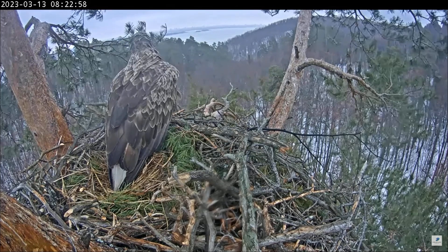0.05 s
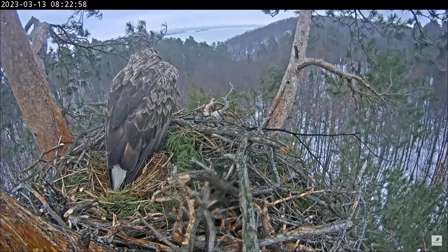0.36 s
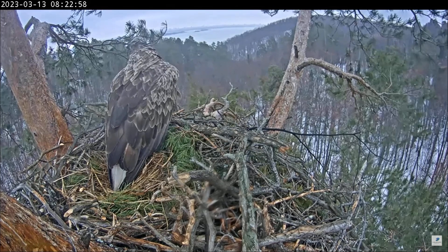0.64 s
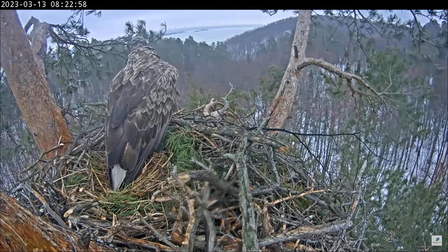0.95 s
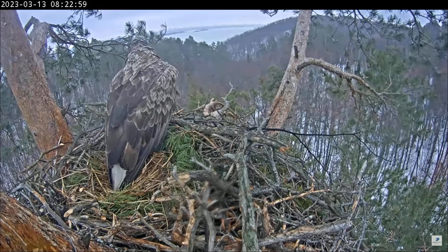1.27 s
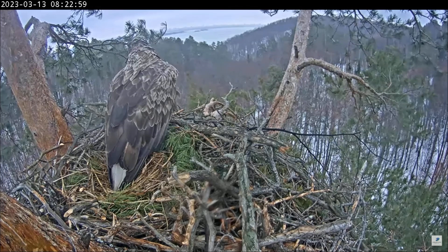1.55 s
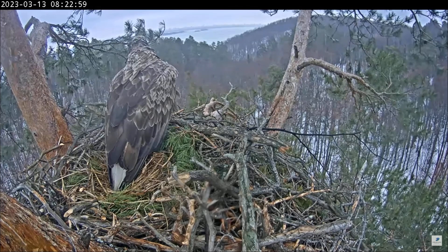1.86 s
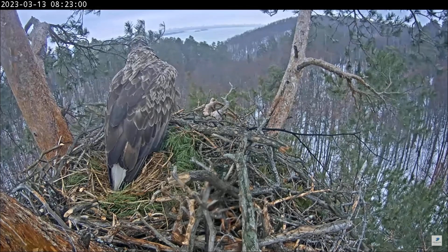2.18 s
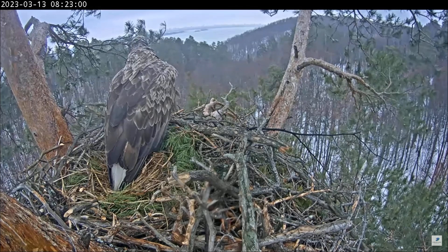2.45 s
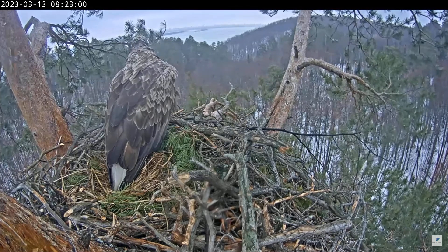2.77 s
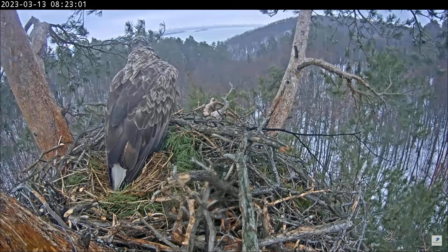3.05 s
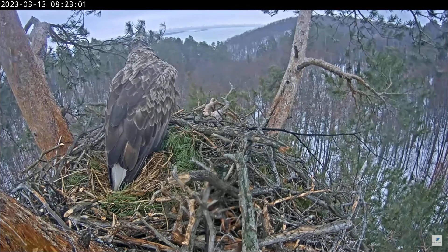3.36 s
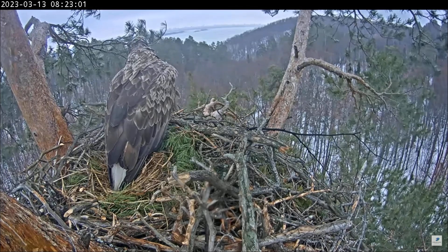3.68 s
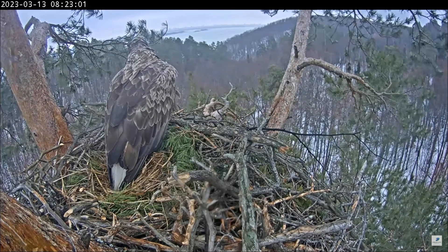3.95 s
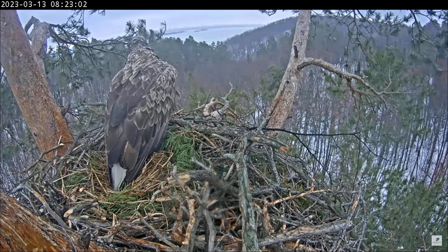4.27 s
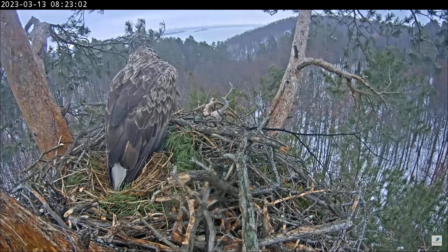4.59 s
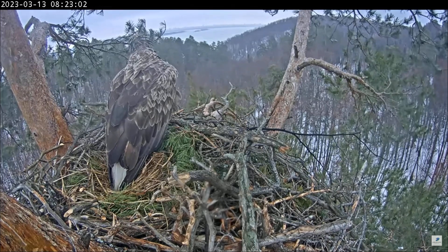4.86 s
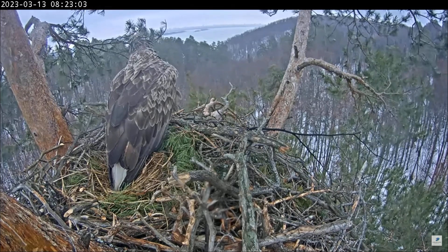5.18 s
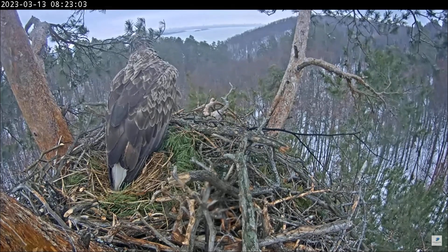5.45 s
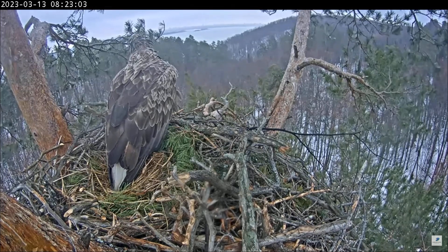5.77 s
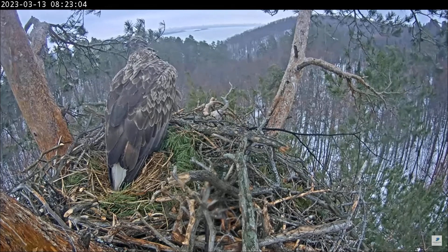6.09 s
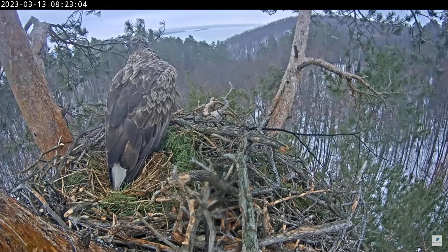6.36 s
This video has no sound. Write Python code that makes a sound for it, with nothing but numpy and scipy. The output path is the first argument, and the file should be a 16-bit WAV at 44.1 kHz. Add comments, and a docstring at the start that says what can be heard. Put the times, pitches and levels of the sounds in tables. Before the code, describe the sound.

The first half second is silent. At 0.5 seconds the sound cuts in on a mild gust, easing by about 2 seconds into a steady roar of wind in the treetops. Beneath it runs a low, wandering rumble, with soft microphone hiss and a faint, thin, high whine, all lasting until the end near 6.7 seconds. Twigs tick irregularly close by, tiny and dry, sharpest at about 1.6 and 5.4 seconds. From 1.8 seconds small birds whistle faintly far away, echoing among the trunks, and again around 2.3, 3.9 and 5 seconds. A nearer small bird gives two high, falling chirps around 3 seconds and three more between 5.4 and 5.8 seconds. The birds stay quiet under the wind. Everything is heard from one small fixed microphone at a treetop nest, with the highest treble missing.

```python
"""Winter forest, from a small fixed microphone at a treetop nest, with nothing above 8 kHz.
After half a second the sound cuts in on a gust, which settles to a steady roar of wind in the crowns
over a low rumble and the microphone's own hiss and thin whine. Twigs tick close by from then on.
From about 1.8 s small birds whistle far off, echoing from the trunks; a nearer bird calls
twice around 3 s and three times around 5.5 s."""
import sys
import numpy as np
from scipy import signal
from scipy.fft import rfft, irfft
from scipy.io import wavfile

SR = 44100
rng = np.random.default_rng(int(sys.argv[2]) if len(sys.argv) > 2 else 0)


def unload_wav(signal):
    """Save mono or channel-first audio to the path in sys.argv[1] as 16-bit WAV at rate SR, clipped to [-1, 1]."""
    wavfile.write(
        sys.argv[1],
        SR,
        np.round(np.clip(np.atleast_2d(signal).T, -1, 1) * 32767).astype(np.int16),
    )


N = 287973
T = np.arange(N) / SR
START_S = 0.5085  # the microphone cuts in


def undb(db):
    """Decibels to gain."""
    return 10 ** (np.asarray(db) / 20)


def level(x, db):
    """Set the rms level."""
    return x * undb(db) / np.sqrt(np.mean(x ** 2))


def add(out, s, x):
    """Mix x in at time s."""
    i = int(s * SR)
    out[i:i + len(x)] += x[:max(N - i, 0)]


def walk(rate_hz):
    """Smooth random drift that changes about rate_hz times a second; rms 1."""
    hz = np.fft.rfftfreq(N, 1 / SR)
    return level(irfft(rfft(rng.standard_normal(N)) * np.exp(-(hz / rate_hz) ** 2), N), 0)


def flickering_noise(points, flicker_db, flicker_hz, band_count=12):
    """Noise of a given colour, in overlapping bands whose levels flicker on their own."""
    octave = np.log2(np.maximum(np.fft.rfftfreq(N, 1 / SR), 1))
    hz, db = np.transpose(points)
    edges = np.log2(hz)
    spectrum = rfft(rng.standard_normal(N)) * undb(np.interp(octave, edges, db))
    spectrum *= np.minimum(2 ** (octave - edges[0]), 1)  # dies away below the lowest point
    centres = np.linspace(edges[0], edges[-1], band_count)
    bands = (irfft(spectrum * np.interp(octave, centres, share), N) for share in np.eye(band_count))
    return sum(band * undb(flicker_db * walk(flicker_hz)) for band in bands)


def echoes(x, delay_s, t60_s, db):
    """A dense cloud of reflections that returns after a delay and falls 60 dB in t60_s."""
    tail = rng.standard_normal(SR) * np.exp(-np.log(1000) * T[:SR] / t60_s)
    cloud = signal.fftconvolve(x, tail / np.linalg.norm(tail))
    return undb(db) * np.pad(cloud, (int(delay_s * SR), 0))[:N]


def wind(steady_db=-18.1, gust_db=2.0, gust_decay_s=0.75):
    """Eddies in the crowns make a broad roar; the opening gust dies away to a steady level."""
    # spectrum of the roar: f/Hz, relative density/dB
    roar_spectrum = [(20, -6.5), (40, 2.5), (62, 4), (95, 1.5), (130, 1.5), (220, 0), (450, 1),
                     (700, -1.46), (1000, -2.5), (1280, -7.5), (1450, -12), (1650, -23.5), (2000, -28),
                     (3500, -65.5)]
    roar = level(flickering_noise(roar_spectrum, flicker_db=0.5, flicker_hz=20), steady_db)
    strength_db = gust_db * np.exp(-np.maximum(T - START_S, 0) / gust_decay_s)
    return roar * undb(strength_db + 0.18 * walk(7.2))


def rumble(octave_db=-37, swell_db=0.2):
    """Under the wind, a narrow low drone and its octave wander in pitch and swell."""
    # course of the drone's fundamental: t/s, f/Hz, level/dB
    drone = [(0.5, 60.18, -36), (3.1, 61.75, -34.5), (3.8, 66.2, -32), (4.3, 70.86, -31), (5.0, 63.03, -40),
             (5.8, 72, -28), (6.5, 68.1, -36.5)]
    times, *columns = np.transpose(drone)
    hz, low_db = (np.interp(T, times, column) for column in columns)
    phase = 2 * np.pi * np.cumsum(hz) / SR
    low, octave = (walk(5.6) * np.sin(k * phase) + walk(7) * np.cos(k * phase) for k in (1, 2))
    return (level(low, low_db) + level(octave, octave_db)) * undb(swell_db * walk(1))


def microphone_noise(hiss_db=-33, whine_hz=5110, whine_db=-48.5):
    """The microphone's electronics add hiss and a thin, slightly unsteady whine."""
    # spectrum of the hiss: f/Hz, relative density/dB
    hiss_spectrum = [(900, 4), (1750, 0.5), (2150, 4), (2500, .5), (2800, 0), (3150, 0.5), (3450, 0),
                     (3850, -2.5), (4500, -3), (5250, -3), (5800, -4.5), (6500, -7), (7200, -12.5),
                     (7700, -23)]
    hiss = flickering_noise(hiss_spectrum, flicker_db=0.88, flicker_hz=18)
    hz = whine_hz + 7 * walk(20)
    whine = np.sin(2 * np.pi * np.cumsum(hz) / SR) * undb(walk(9))
    return level(hiss, hiss_db) + level(whine, whine_db)


def tick(hz, low_db=-15, low_ratio=0.57, cycles_to_peak=3.6):
    """A twig rings for a few cycles in two modes: rounded swell, quick decay."""
    cycles = hz * T[:SR // 50]
    age = cycles / cycles_to_peak
    ring = np.sin(2 * np.pi * cycles) + undb(low_db) * np.sin(2 * np.pi * low_ratio * cycles)
    return (age * np.exp(1 - age)) ** 4 * ring


def twigs(faint_db=-33, spread_db=1.75, faint_count=30):
    """Close ticks over a sparse faint crackle, scattered by the sticks of the nest."""
    # twig ticks: t/s, ring f/Hz, ring peak level/dB, lower mode level/dB relative to the ring
    ticks = [(0.561, 5200, -20, -21), (0.77, 5700, -21, -20), (1.331, 5640, -14, -18),
             (1.6306, 3040, -4.5, -25), (1.78, 2920, -18.5, -15), (2.0032, 3020, -23, -13),
             (2.2515, 3100, -22, -10), (2.5416, 3020, -17, -20), (3.1974, 2980, -15.5, -15),
             (3.417, 3200, -19, -9), (3.9814, 3130, -15, -22), (4.2546, 6200, -21, -14),
             (5.017, 5500, -20, 0), (5.4358, 3130, -8, -5), (5.4743, 3700, -18, -15),
             (5.5839, 3120, -16.5, -2), (5.6328, 5900, -20.5, -5), (6.5108, 3220, -15, -15)]
    out = np.zeros(N)
    for s, hz, db, low_db in ticks:
        add(out, s, undb(db) * tick(hz, low_db))
    for when, pitch, size in rng.random((faint_count, 3)):
        db = faint_db - spread_db * np.log(1 - size)  # most are faint, a few louder
        add(out, when * T[-1], undb(db) * tick(3000 + 3500 * pitch))
    return out + echoes(out, delay_s=0, t60_s=0.033, db=-7)


def bird_notes():
    """Every whistle as t/s, length/s, start f/Hz, end f/Hz, relative level/dB."""
    # syllables of the nearer bird: t/s, lead-in f/Hz, relative chirp level/dB, relative slur level/dB
    syllables = [(2.832, 7240, -23, -32), (3.033, 7070, -25.5, -39.5), (5.367, 7000, -21, -33),
                 (5.568, 6940, -24, -29), (5.766, 6950, -29.5, -31)]
    # whistles of the far birds, by kind: length/s, start f/Hz, end f/Hz
    far_whistles = {"thin": (0.12, 5290, 5175), "sigh": (0.085, 2680, 2530), "pipe": (0.06, 2135, 2190),
                    "slide": (0.055, 5900, 5150)}
    # calls of the far birds: t/s, kind, relative level/dB
    far_calls = [(1.819, "sigh", -40.5), (1.872, "thin", -38), (2.261, "thin", -38), (3.812, "pipe", -38),
                 (3.82, "sigh", -40), (3.918, "slide", -38), (4.89, "pipe", -40), (5.033, "thin", -37),
                 (5.41, "thin", -33)]
    for s, lead_hz, chirp_db, slur_db in syllables:
        yield s, 0.027, lead_hz, lead_hz - 40, -37  # high lead-in
        yield s + 0.035, 0.022, 5690, 4830, chirp_db  # falling chirp
        yield s + 0.06, 0.085, 3570, 3050, slur_db  # low slur
    for s, kind, db in far_calls:
        yield s, *far_whistles[kind], db


def birds(bend=1.408, flutter_db=2.5, gain_db=-2.0):
    """Distant whistles slide fast at first and then ease off; the trunks smear each into a tail."""
    # echoes from the near trunks and the far forest: delay/s, time to fall 60 dB/s, level/dB
    near_trunks = (0.012, 0.33, 0)
    far_forest = (0.05, 1.4, 1)
    whistles = np.zeros(N)
    waver = 1 + 0.007 * walk(260)
    for s, length_s, start_hz, end_hz, db in bird_notes():
        progress = np.linspace(0, 1, int(length_s * SR))
        hz = end_hz + (start_hz - end_hz) * (1 - progress) ** bend
        hz *= waver[int(s * SR):][:len(hz)]
        envelope = np.sqrt(np.abs(np.sin(np.pi * progress)))
        add(whistles, s, undb(db) * envelope * np.sin(2 * np.pi * np.cumsum(hz) / SR))
    calls = whistles * undb(gain_db + flutter_db * walk(70))  # moving air makes the level flutter
    # over long paths the air takes the treble, so only the low notes linger
    dulled = signal.sosfilt(signal.butter(3, 3800, fs=SR, output="sos"), calls)
    return calls + echoes(calls, *near_trunks) + echoes(dulled, *far_forest)


def scene():
    """Everything meets at the one microphone by the nest."""
    return (wind() + rumble() + twigs() + birds() + microphone_noise())[None]


def record(dry, rolloff_hz=7100, top_hz=7750):
    """The microphone cuts in abruptly; its treble rolls off and then ends steeply."""
    gated = dry * (T >= START_S)
    softened = signal.sosfilt(signal.butter(14, rolloff_hz, fs=SR, output="sos"), gated)
    return signal.sosfilt(signal.ellip(10, 0.2, 80, top_hz, fs=SR, output="sos"), softened)


dry = scene()
out = record(dry)
unload_wav(out)
```